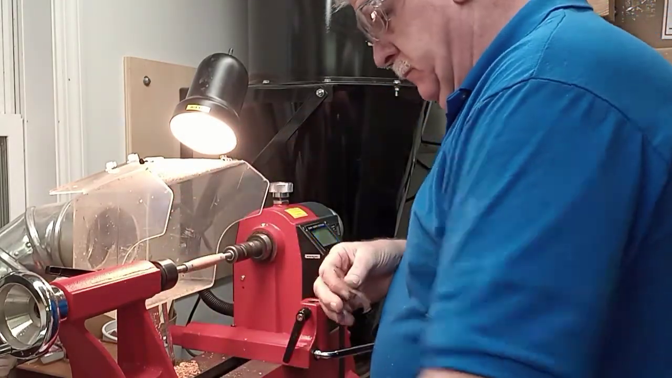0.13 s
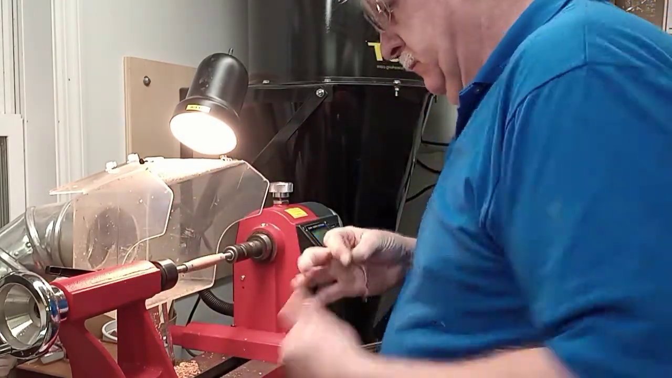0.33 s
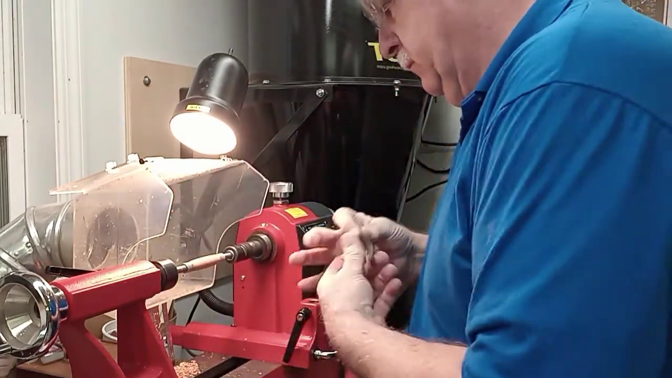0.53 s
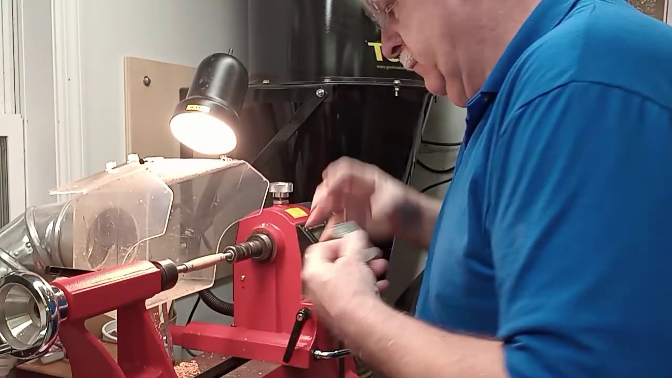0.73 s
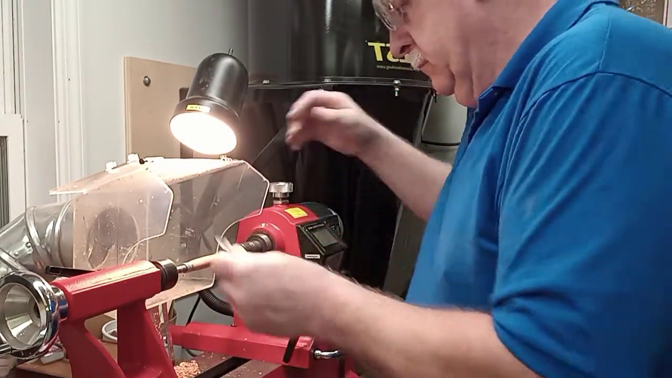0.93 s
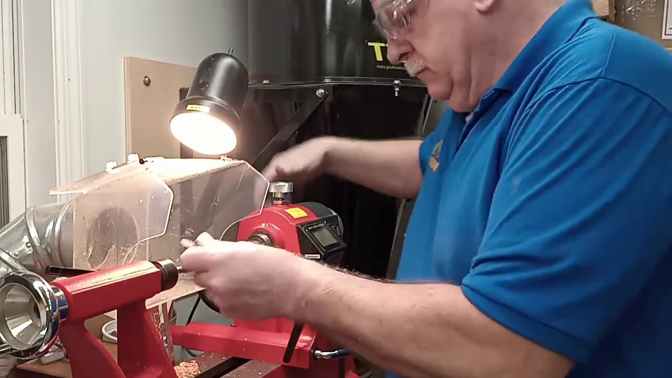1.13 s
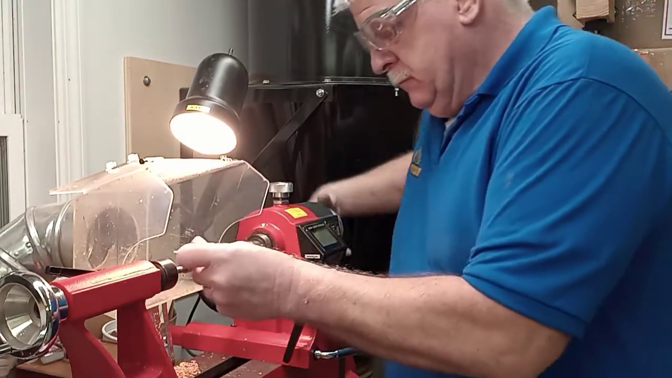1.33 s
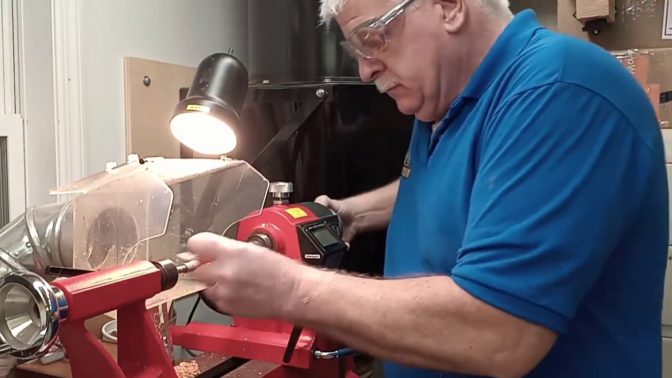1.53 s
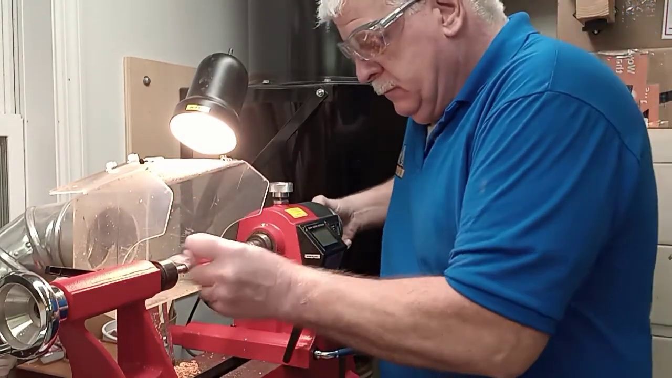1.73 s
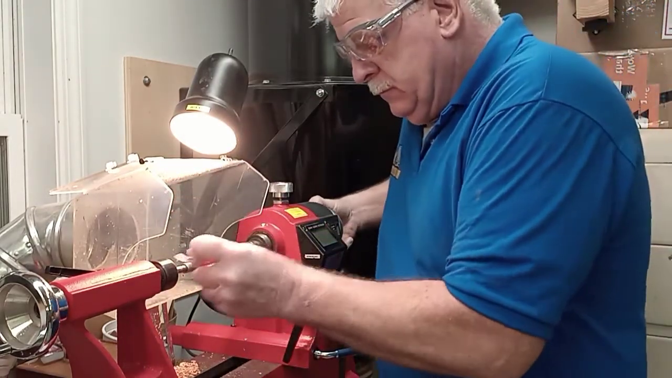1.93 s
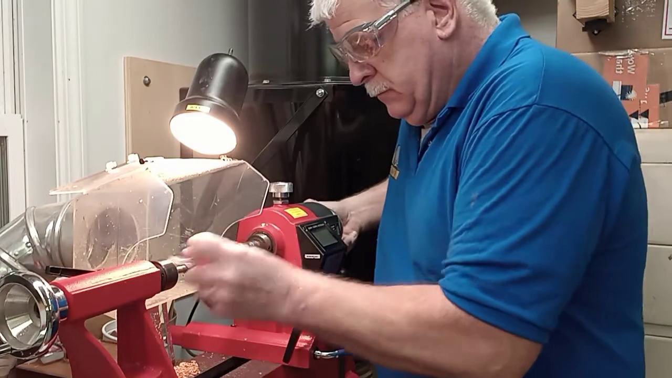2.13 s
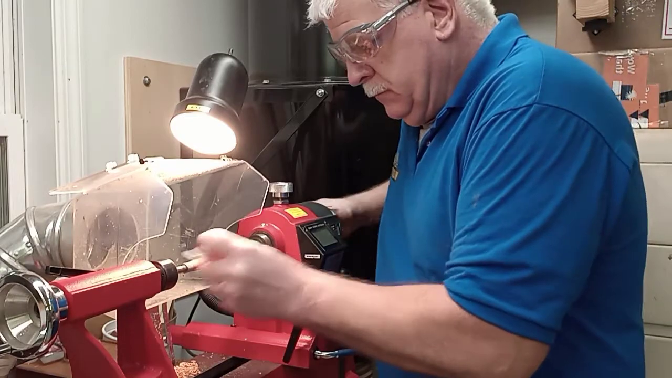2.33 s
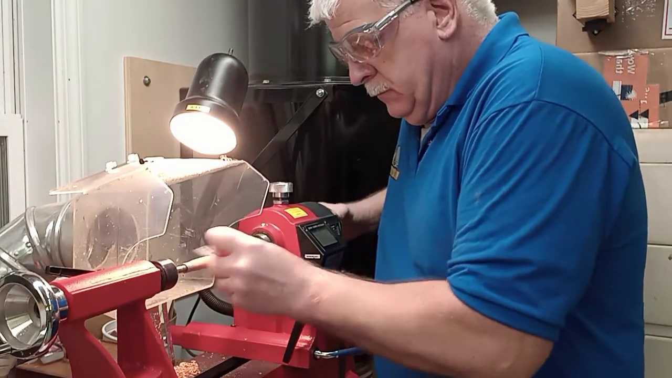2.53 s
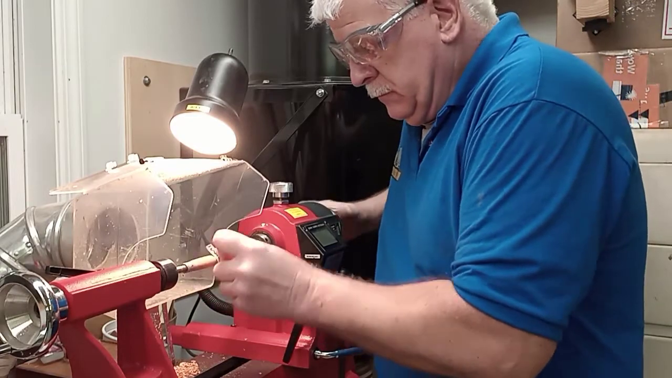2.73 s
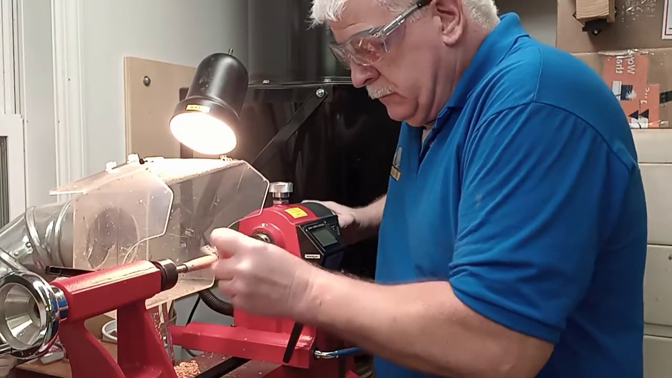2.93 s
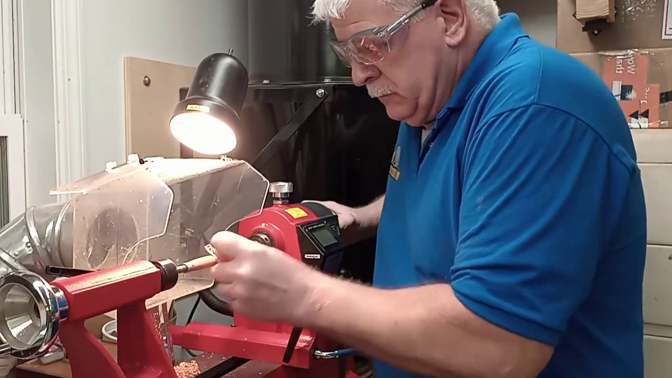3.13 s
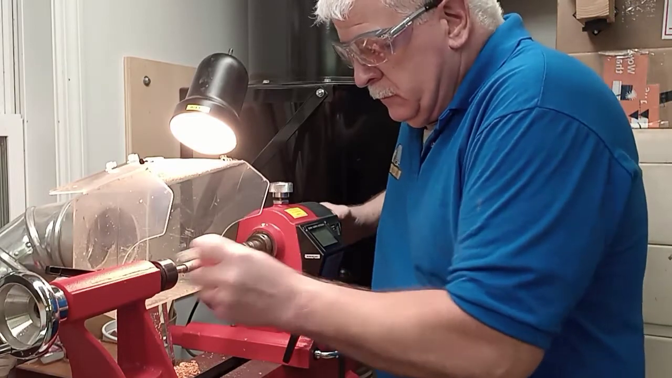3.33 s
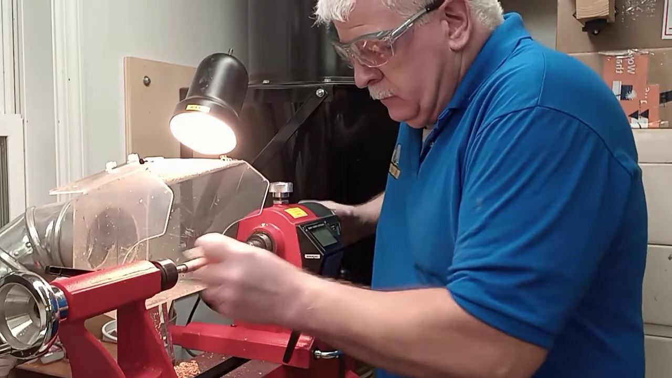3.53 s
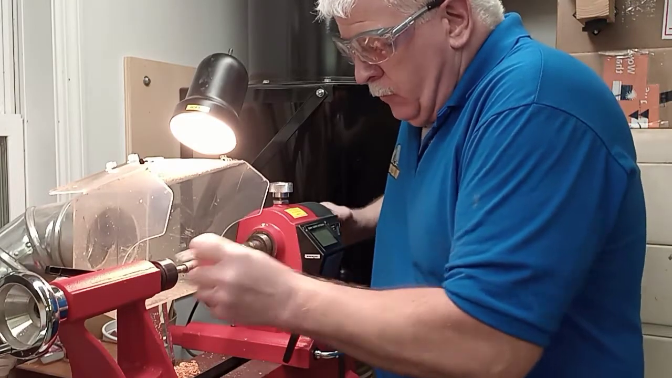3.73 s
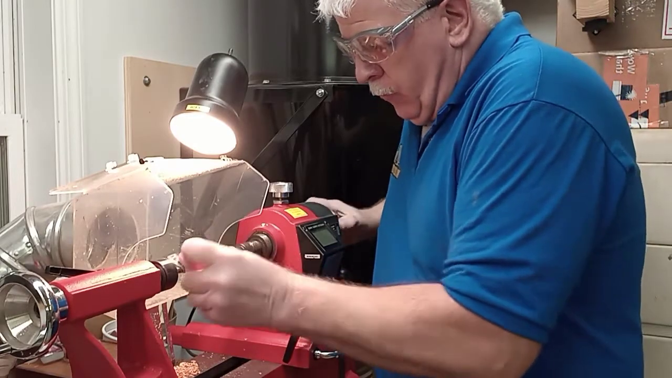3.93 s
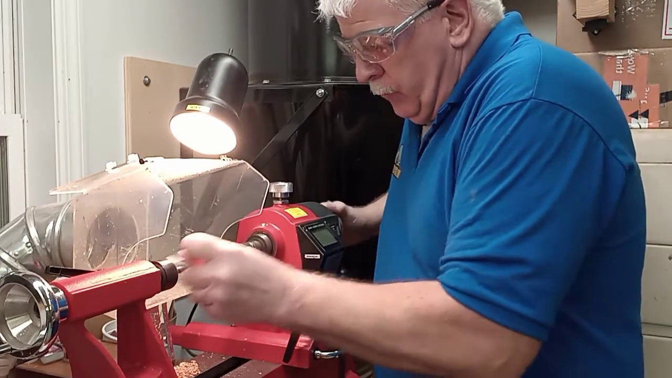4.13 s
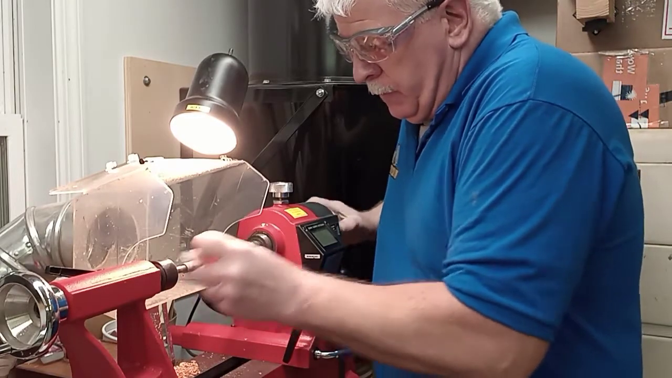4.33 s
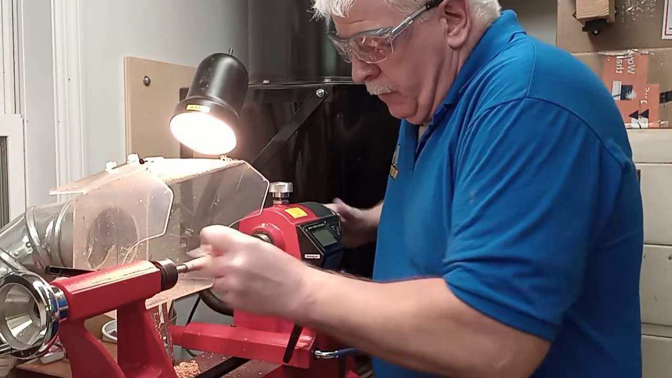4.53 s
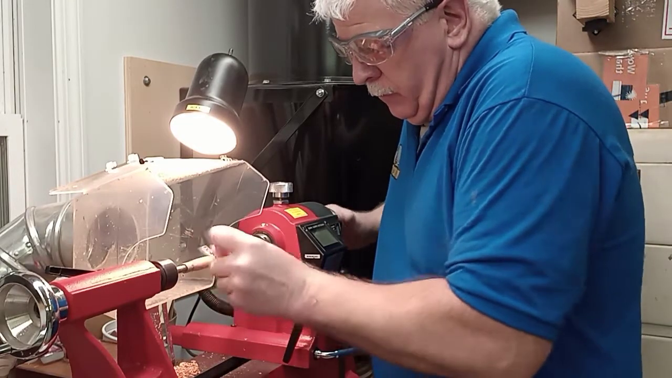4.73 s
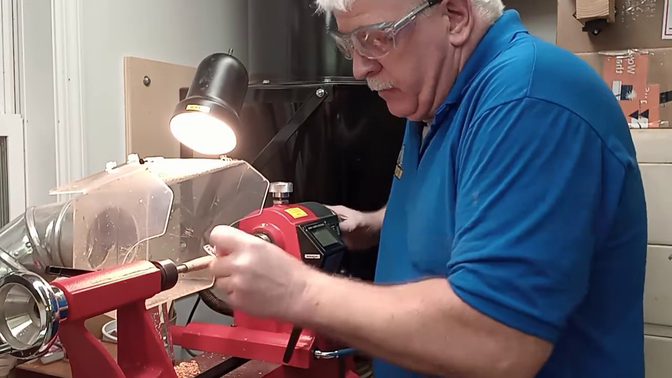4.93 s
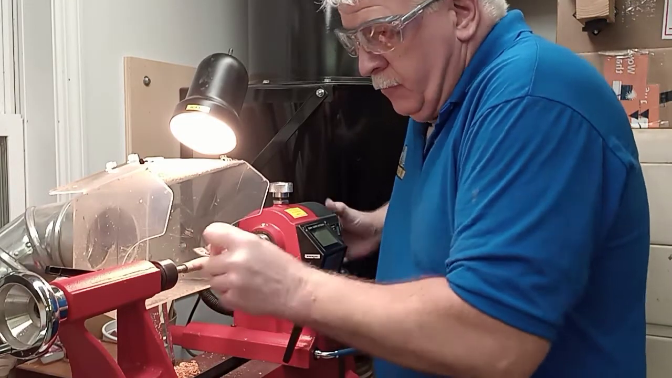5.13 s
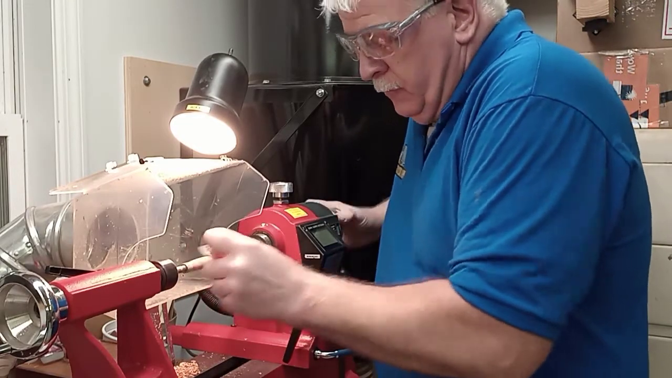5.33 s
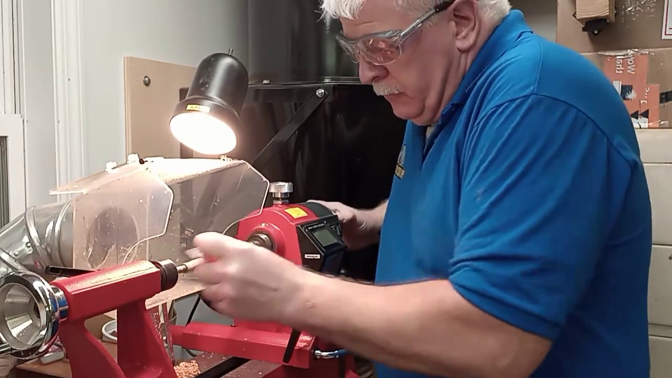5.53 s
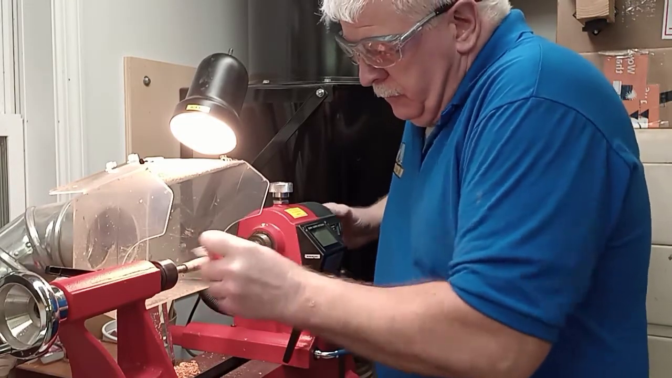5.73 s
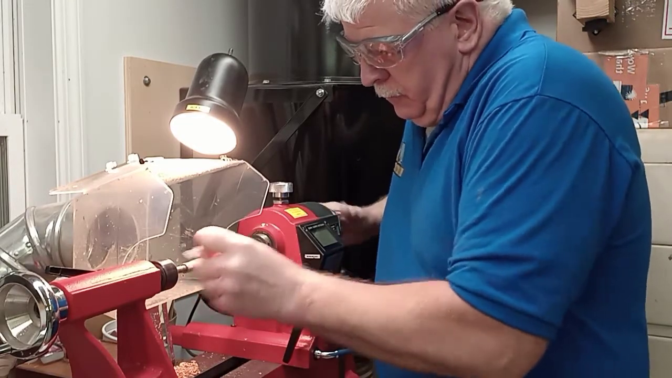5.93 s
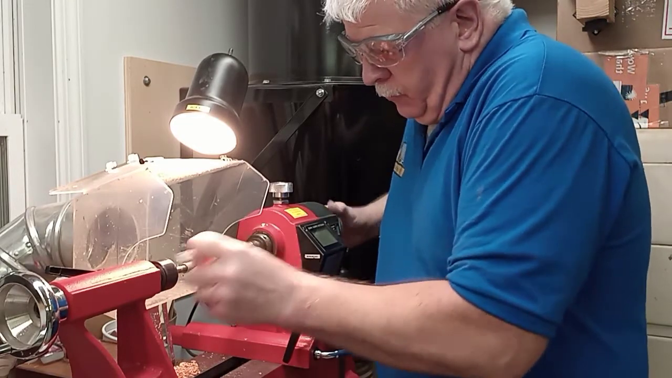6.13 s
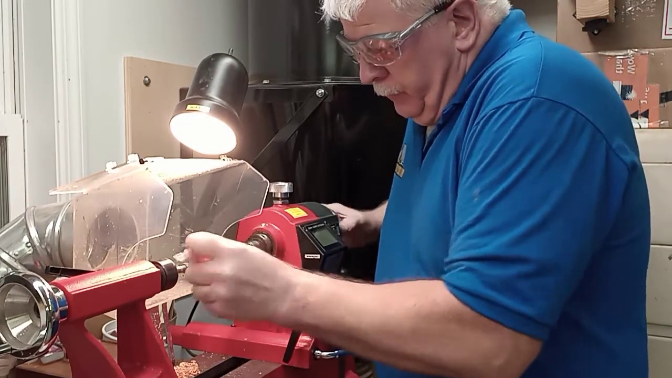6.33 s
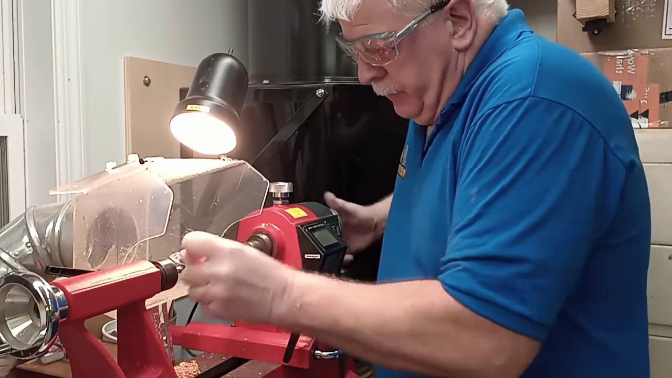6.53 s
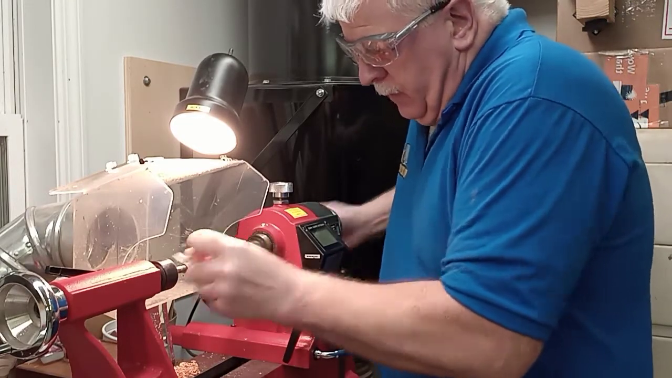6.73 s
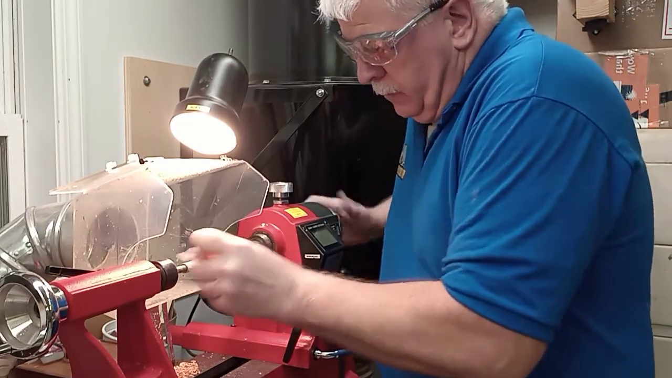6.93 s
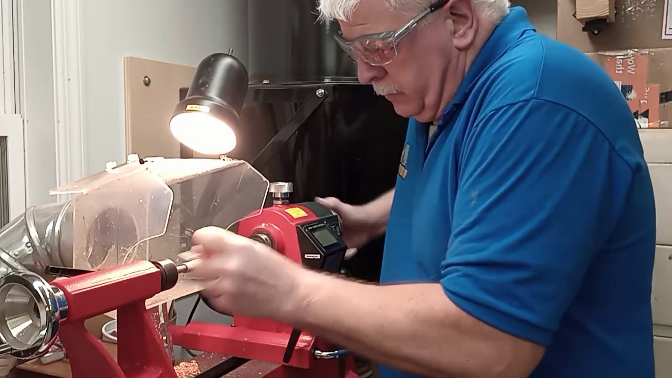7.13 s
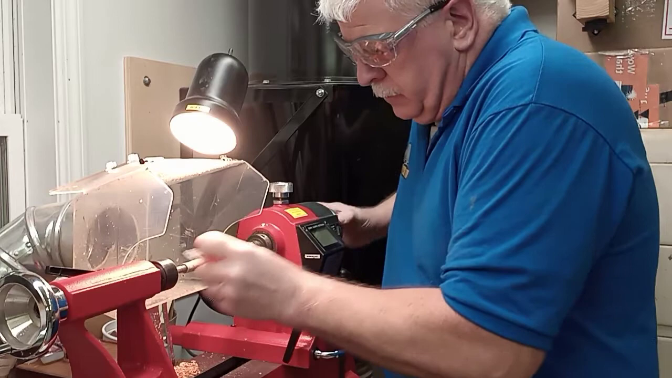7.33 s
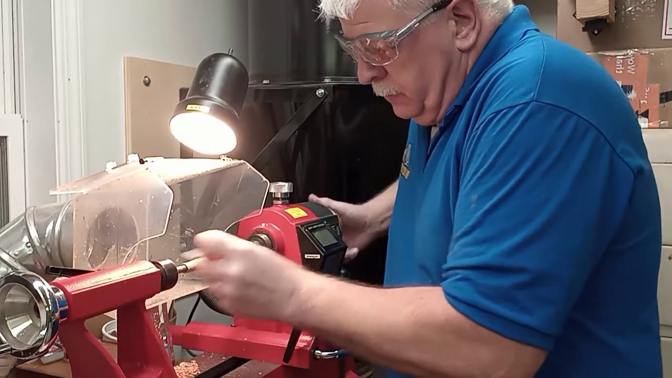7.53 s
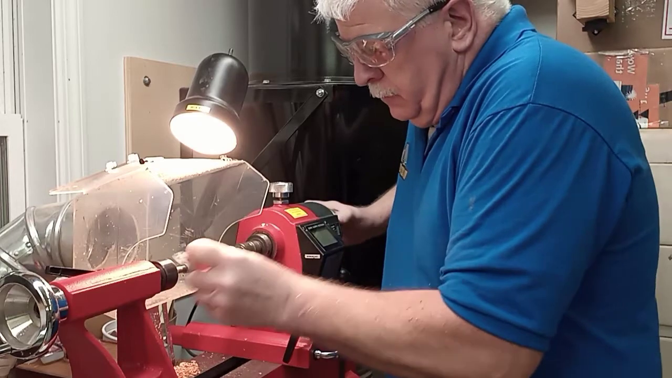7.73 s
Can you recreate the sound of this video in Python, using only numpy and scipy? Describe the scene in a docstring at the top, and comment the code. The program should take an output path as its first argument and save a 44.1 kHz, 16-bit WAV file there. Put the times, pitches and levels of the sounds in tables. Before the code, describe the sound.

Sandpaper rasps rapidly back and forth on a thin wooden piece, after a fading rush of compressed air and some paper rustling.

```python
"""Sandpaper on an idle lathe

An air blast knocks and dies away in the dust hood; fingers shuffle the paper, which snaps taut and
shakes the bench. Rubbed quickly to and fro, its grit hisses and bites, its sheet rasps and the thin
wooden blank rings. Low drones come from outside, over a few soft hoots, room noise and rumble.
The shop walls echo the handwork. Two microphone ports colour the treble differently."""
import sys
import numpy as np
from scipy import signal
from scipy.fft import rfft, irfft, next_fast_len
from scipy.io import wavfile
from scipy.ndimage import uniform_filter1d, map_coordinates

SR = 44100
rng = np.random.default_rng(int(sys.argv[2]) if len(sys.argv) > 2 else 0)


def transcribe(u):
    """Save the signal u as a 16-bit wav file named by the first command-line argument.

    u: samples, shape (n,) or (channels, n), limited to [-1, 1]; the rate is SR.
    q: integer samples, one column per channel.
    """
    v = np.clip(np.atleast_2d(u).T, -1, 1)
    q = np.round(v * 32767).astype(np.int16)
    wavfile.write(sys.argv[1], SR, q)


N = 343098
TIME = np.arange(N) / SR
LAG_S = 7.24 / SR  # lathe sound reaches the left port later


def amp(db):
    return 10 ** (np.asarray(db) / 20)


def unit_rms(x):
    return x / np.sqrt(np.mean(x ** 2) + 1e-20)


def at_hz(points, hz):
    """Interpolate (f, value) points on a log axis."""
    f, values = np.transpose(points)
    return np.interp(np.log(hz + 1), np.log(f + 1), values)


def curves(rows):
    """Interpolate (t, values...) rows to every sample."""
    times, *columns = np.transpose(rows)
    return [np.interp(TIME, times, column) for column in columns]


def wobble(rate_hz):
    """Random curve, linear between Gaussian knots."""
    knots = rng.standard_normal(int(N * rate_hz / SR) + 4)
    return map_coordinates(knots, [TIME * rate_hz], order=1)


def filtered(x, response):
    """Apply a complex frequency response."""
    size = next_fast_len(N + SR // 2)
    return irfft(rfft(x, size) * response(np.fft.rfftfreq(size, 1 / SR)), size)[..., :N]


def shape(points):
    """Response from (f/Hz, gain/dB) points."""
    return lambda hz: amp(at_hz(points, hz))


def modes(rows):
    """Response of parallel resonators, alternating in sign."""
    return lambda f: sum((-1) ** k * amp(db) * 1j * f * width / (hz * hz - f * f + 1j * f * width)
                         for k, (hz, width, db) in enumerate(rows))


# Left-right likeness: f/Hz, coherence/1
COHERENCE = [(30, 0.85), (80, 0.81), (200, 0.72), (550, 0.96), (1000, 0.24), (3000, 0.27), (5500, 0.39),
             (8000, 0.1), (16000, .05)]


def noise(response, grain_db, patchy_db=3.5, lag_s=LAG_S):
    """Unit-rms stereo noise; level flicker (grain) and passing resonances (patches) are shared."""
    grainy = rng.standard_normal((2, N)) * amp(grain_db * wobble(700))
    spectra = signal.stft(grainy, nperseg=256)[2]
    patches = uniform_filter1d(rng.standard_normal(spectra.shape[1:]), size=2, axis=0)
    patches = unit_rms(uniform_filter1d(patches, size=9, axis=1))
    mid_side = signal.istft(spectra * amp(patchy_db * patches), nperseg=256)[1][:, :N]

    def port(side):
        def mix(hz):
            angle = np.arccos(at_hz(COHERENCE, hz)) / 2
            delay = np.exp(-1j * side * np.pi * hz * lag_s)
            return response(hz) * delay * [np.cos(angle), side * np.sin(angle)]
        return filtered(mid_side, mix).sum(0)
    return unit_rms(np.array([port(0.91), port(-1.055)]))


# Hood modes (lower pair, upper pair, broad body), per filter pass: f/Hz, width/Hz, gain/dB
HOOD_MODES = [(342, 39, 2.5), (414, 25, -6), (478.7, 63, -1.5), (552, 64, -7.5), (270, 81, -6),
              (727, 690, 0)]
# Boom envelope: t/s, lower pair/dB, upper pair/dB, broad body/dB
HOOD_LEVELS = [(0, -40, -55, -43.5), (.04, -65, -55, -59.5), (.09, -55, -56, -54.5), (.13, -66, -46.5, -54),
               (.165, -49, -56, -61), (.21, -51, -54, -61), (.26, -62, -58.5, -61), (.3, -62, -58, -62),
               (.325, -59, -58, -67), (.37, -50, -57, -63), (.395, -64, -62, -60), (.42, -52, -58, -68),
               (.45, -58, -66, -74), (.516, -60.5, -67, -78), (.574, -78, -78, -81), (.65, -81, -75, -89),
               (.8, -85, -100, -98), (.9, -102, -92, -106)]


def hood_boom():
    """Turbulence drives the hood, which is too small to sound below its lowest mode."""
    highpass = lambda hz: 1 / (1 + (200 / (hz + 1)) ** 6)
    turbulence = noise(highpass, grain_db=-1, patchy_db=-2, lag_s=0.00038)
    out = np.zeros((2, N))
    for db, group in zip(curves(HOOD_LEVELS), (HOOD_MODES[:2], HOOD_MODES[2:4], HOOD_MODES[4:])):
        ring = unit_rms(filtered(turbulence, lambda hz: modes(group)(hz) ** 2))
        out += amp(db + 1.4 * wobble(40)) * ring
    return out * amp([[-0.25], [0.25]])


# Duct modes: f/Hz, width/Hz, gain/dB
DUCT_MODES = [(1060, 40, -0.5), (1200, 66, -4), (1315, 28, -2), (1522, 59, 0), (1714, 82, -3),
              (2020, 58, -5), (2284, 38, -8), (2750, 146, -7), (3150, 18, -9.5), (4020, 49, 1.5),
              (4700, 33, 2.5), (5240, 37, -1), (5230, 23, -25), (5800, 76, -31)]


def duct_rush(blast_db):
    """Air rushes through the duct's modes, dull above 9 kHz."""
    lower = noise(modes(DUCT_MODES[:9]), grain_db=1, patchy_db=-0.5, lag_s=0.00033)
    upper = noise(modes(DUCT_MODES[9:]), grain_db=2.5, patchy_db=1.5, lag_s=0.000332)
    rush = amp(-41 + blast_db + 0.32 * wobble(38)) * lower + amp(-48.5 + 1.1 * blast_db) * upper
    return filtered(rush, lambda hz: 1 / (1 + (hz / 9000) ** 8))


# Jet spectrum: f/Hz, density/dB
JET_SPECTRUM = [(2500, -14), (4000, -6), (6500, -0.5), (10000, -12), (12000, -23), (14000, -60)]


def jet_fizz(blast_db, trickle_s=1.6):
    """The jet fades with the blast, then trickles on briefly."""
    trickle = amp(-89) / (1 + (TIME / trickle_s) ** 12)
    level = amp(-45.5 + 1.37 * blast_db) + trickle
    return level * noise(shape(JET_SPECTRUM), grain_db=1, patchy_db=1.5, lag_s=0)


# Blast decay: t/s, strength/dB
BLAST_STRENGTH = [(0, -0.5), (.07, -3.5), (.3, -9.5), (.46, -16), (.57, -27), (.77, -45), (.95, -51),
                  (1.2, -66)]


def air_blast(whine_hz=14180):
    """Hood, duct, jet and a thin whine die away together."""
    blast_db, = curves(BLAST_STRENGTH)
    phase = 2 * np.pi * np.cumsum(whine_hz + 15 * wobble(56)) / SR
    whine = amp(-79 + 0.6 * blast_db + 3.1 * wobble(23)) * np.sin(phase)
    return hood_boom() + duct_rush(blast_db) + jet_fizz(blast_db) + whine


# Shop background: f/Hz, density/dB
ROOM_SPECTRUM = [(150, -17.5), (300, -6), (500, -12), (1000, -7.5), (2500, -17.5), (5000, -45), (8000, -16),
                 (11000, -39), (16000, -35)]


def room_noise():
    """Faint noise of the shop's air, wandering in level."""
    level = amp(-83 + 1.94 * wobble(2.55) + 2.5 * wobble(6))
    return level * noise(shape(ROOM_SPECTRUM), grain_db=1, patchy_db=4, lag_s=0.00039)


# Rumble envelope: t/s, level/dB
RUMBLE_LEVELS = [(0, -99), (.3, -86), (1.3, -83), (1.6, -87), (2.5, -92), (3.1, -80.5), (4.0, -86.5),
                 (4.3, -81.5), (5.8, -77.5), (6.5, -83), (7.78, -84.5)]
# Rumble spectrum: f/Hz, density/dB
RUMBLE_SPECTRUM = [(15, -17), (30, -13), (55, -1.5), (100, 4), (200, -3), (350, -22.5), (600, -36)]


def rumble():
    """Low noise swells and ebbs."""
    db, = curves(RUMBLE_LEVELS)
    return amp(db + 2.8 * wobble(8)) * noise(shape(RUMBLE_SPECTRUM), grain_db=-2, lag_s=0)


# Brief tones: centre t/s, level/dB, f/Hz, spread/Hz, length/s
BRIEF_TONES = [(.133, -48.5, 1192, 51, 0.076), (.136, -41.5, 1234, 150, 0.0055), (.68, -84, 460, 28, 0.23),
               (1.213, -58, 170.2, 45, 0.0068), (1.296, -65, 574, 60, 0.041),
               (1.307, -68.5, 589, 60, 0.013), (1.321, -68, 598, 60, 0.018), (1.82, -80, 132.7, 3.6, 0.19),
               (1.91, -75, 137, 7, 0.062), (1.89, -80, 92, 8, 0.14), (3.05, -72, 136, 6.3, 0.077),
               (4.25, -72.5, 132, 3.91, 0.13), (7.006, -67, 332.3, 30, 0.055), (7.399, -65, 477, 30, 0.045),
               (7.397, -75, 363, 40, 0.039)]


def brief_tones():
    """A knock in the air blast, the hood's fading ring, then soft hoots; neighbours blur each tone."""
    out = np.zeros((2, N))
    for centre, db, hz, spread_hz, length in BRIEF_TONES:
        t = TIME - centre
        detune, phase = rng.standard_normal((2, 3, 1))
        swell = np.exp(-(t / (0.57 * length)) ** 2)
        tone = np.sin(2 * np.pi * hz * t + [[-0.3], [0.3]])
        blur = np.sin(2 * np.pi * ((hz + spread_hz * detune) * TIME + phase)).sum(0)
        out += amp(db) * swell * (tone + 0.5 * blur)
    return out


# Finger shuffles: t/s, level/dB, dull re bright/dB, rise/s, t60/s
PAPER_SHUFFLES = [(.465, -58.5, -30, 0.014, 0.37), (0.533, -47, -32, 0.0049, 0.076),
                  (.6, -62, -27, 0.014, 0.11), (0.669, -55.5, -12, 0.011, 0.31),
                  (.705, -63, 2, 0.022, 0.17), (.79, -54.5, -9, 0.049, 0.29),
                  (0.839, -52, -27, 0.014, 0.12), (.89, -69.5, -4, 0.035, 0.35),
                  (0.95, -68, -10, 0.0085, 0.66), (1.053, -49, -17.5, 0.021, 0.22),
                  (1.083, -55, -1.5, 0.02, 0.23), (1.204, -39, 0, 0.015, 0.2)]


def paper_shuffles():
    """Fingers shift the paper: bright grit and dull sheet rustle under one fade."""
    bright, dull = np.zeros((2, N))
    for onset, db, dull_db, rise, t60 in PAPER_SHUFFLES:
        t = np.maximum(TIME - onset + rise, 0)
        fade = amp(db - 60 * t / t60) * (1 - np.exp(-(t / rise) ** 2))
        bright += fade
        dull += fade * amp(dull_db)
    grit = shape([(2500, -68), (4300, -8), (5200, -2.5), (6500, 6.5), (8500, -0.5), (11000, -0.5),
                  (16000, -21)])
    sheet = shape([(600, -13), (1300, -8.5), (1700, 1.5), (3000, 3), (4500, 5), (7000, -9)])
    return (bright * noise(grit, grain_db=1.5, patchy_db=-3.5, lag_s=0)
            + dull * noise(sheet, grain_db=1, patchy_db=-3.5, lag_s=0))


# Paper cracks: t/s, level/dB, f/Hz
PAPER_SNAPS = [(.783, -63, 3300), (1.2083, -28, 3500), (1.2081, -40, 6500), (1.2223, -39, 5600),
               (1.2226, -43, 2000)]


def paper_snaps(width_s=0.0004):
    """The taut paper cracks in Gaussian tone pulses."""
    out = np.zeros(N)
    for centre, db, hz in PAPER_SNAPS:
        t = TIME - centre
        out += amp(db) * np.exp(-(t / width_s) ** 2) * np.sin(2 * np.pi * hz * t)
    return out


def bench_thump(onset_s=1.209):
    """The snap sets the bench's low modes ringing."""
    # f/Hz, level/dB, t60/s
    bench = [(120, -65, 0.6), (171, -81.5, 1.6), (250, -67, 0.16), (74.5, -75, 0.4)]
    t = np.maximum(TIME - onset_s, 0)
    return sum(amp(db - 60 * t / t60 + 2.2 * wobble(18)) * np.sin(2 * np.pi * hz * t)
               for hz, db, t60 in bench)


def stroke_envelope(starts, duty, shares, levels_db, lull_db, rise_s):
    """Level in dB, set at shares of each slide; between slides the hand slows, stops and turns."""
    period = np.diff(starts, append=2 * starts[-1] - starts[-2])
    slide = duty * period
    gap = np.roll(period - slide, 1)
    rise = np.minimum(rise_s, 0.8 * gap)
    first_db, previous_db = levels_db[0], levels_db[-1][:-1]
    floor_db = np.minimum(first_db, np.append(first_db[0], previous_db)) - lull_db
    before_db = np.append(floor_db[0], previous_db)
    knee_db = before_db + 0.63 * (floor_db - before_db)
    knee_s = -gap + 0.55 * (gap - rise)
    knots_s = starts + np.vstack([knee_s, -rise, np.outer(shares, slide)])
    knots_db = np.vstack([knee_db, floor_db, *levels_db])
    return np.interp(TIME, knots_s.T.ravel(), knots_db.T.ravel(), left=-120)


# Strokes: t/s, sliding duty/1, coarse grit (first, settled, end)/dB, fine grit (start, end)/dB, flex/dB
SANDING_STROKES = [(1.3995, 0.58, -61.5, -64, -55, -55.5, -50.5, -76),
                   (1.5195, 0.58, -56, -54.5, -55.5, -48, -49, -69),
                   (1.6247, 0.62, -56, -54, -53.5, -48, -54.5, -70),
                   (1.738, 0.48, -56, -51.5, -52, -49, -47, -75),
                   (1.836, 0.42, -46.5, -46, -47, -47.5, -45.5, -74),
                   (1.92, 0.52, -53.5, -50.5, -45.5, -53, -42.5, -71),
                   (2.024, 0.79, -37.5, -49.5, -52.5, -42.5, -50, -68),
                   (2.1184, 0.57, -53, -47, -50.5, -52, -46.5, -72),
                   (2.206, 0.58, -44.5, -45.5, -39, -47.5, -43.5, -67.5),
                   (2.3086, 0.65, -44, -47.5, -48.5, -41.5, -48.5, -65),
                   (2.392, 0.64, -50, -47.5, -43.5, -47.5, -45.5, -72.5),
                   (2.486, 0.74, -44.5, -45.5, -49, -40.5, -47, -63.5),
                   (2.564, 0.71, -45.5, -51, -44.5, -50, -49.5, -63.5),
                   (2.662, 0.52, -46, -43, -42, -43.5, -42, -71),
                   (2.7535, 0.56, -42.5, -45.5, -42.5, -48, -48, -71.5),
                   (2.844, 0.74, -44.5, -50.5, -47.0, -42.5, -49, -68.5),
                   (2.926, 0.6, -45.5, -47, -43, -49.5, -49, -71),
                   (3.026, 0.7, -44, -51, -50.5, -43.5, -47.5, -68),
                   (3.1148, 0.66, -47.5, -48.5, -47.5, -50, -49.5, -71.5),
                   (3.209, 0.66, -48, -50, -49, -46, -45, -70),
                   (3.2984, 0.6, -42.5, -47, -43.5, -47.5, -47.5, -71.5),
                   (3.395, 0.71, -52, -51, -49.5, -47, -49, -73),
                   (3.477, 0.65, -40.5, -48.5, -46, -47.5, -47.5, -72),
                   (3.573, 0.7, -54, -50, -54, -45.5, -46.5, -71.5),
                   (3.6566, 0.68, -54, -54.0, -43.5, -50.5, -48.5, -76),
                   (3.7534, 0.71, -46, -50.5, -48.5, -45.5, -47.5, -70),
                   (3.845, 0.72, -40.5, -49.0, -46.5, -44, -51, -67),
                   (3.937, 0.65, -54, -48.5, -49, -48.5, -45.5, -74.5),
                   (4.026, 0.64, -36.5, -42.5, -44.5, -40.5, -48, -62.5),
                   (4.1184, 0.65, -42.5, -49, -51, -46, -47, -66),
                   (4.207, 0.66, -35.5, -47, -52, -41, -53, -62.5),
                   (4.3, 0.66, -48, -51.5, -48, -46.5, -43, -68.5),
                   (4.382, 0.59, -44.5, -56, -45, -47.5, -48.5, -68.5),
                   (4.479, 0.74, -51, -50.5, -48, -46.5, -44.5, -73),
                   (4.568, 0.61, -38.5, -44.5, -44, -41.5, -46, -59.5),
                   (4.6677, 0.63, -52, -50.5, -43.5, -46, -41.5, -68),
                   (4.76, 0.71, -40, -44.5, -46, -42.5, -50, -64),
                   (4.8564, 0.79, -50, -46, -47, -44.5, -44, -68),
                   (4.9522, 0.63, -33, -50.5, -47, -41.5, -50.5, -63),
                   (5.043, 0.72, -53.5, -50, -43, -49, -42.5, -61.5),
                   (5.137, 0.58, -34.5, -42, -43, -38, -50.5, -55),
                   (5.2385, 0.71, -54, -50.5, -51, -48, -45, -67),
                   (5.337, 0.65, -54, -48.5, -52, -50, -53.5, -66),
                   (5.429, 0.78, -51, -46.5, -50, -47, -48, -69.5),
                   (5.503, 0.5, -45, -48.5, -47.5, -51, -48.5, -65),
                   (5.607, 0.66, -50, -50.5, -55, -47.5, -46.5, -73.5),
                   (5.685, 0.62, -61, -55, -49.5, -55, -51, -74),
                   (5.784, 0.77, -53.5, -52.5, -49.5, -51, -47.5, -71.5),
                   (5.8796, 0.73, -41, -48.5, -51, -47.5, -53, -67),
                   (5.9764, 0.73, -53.5, -50, -47, -49, -43.5, -67.5),
                   (6.061, 0.78, -36.5, -50, -49, -42, -52.5, -61.5),
                   (6.162, 0.72, -51, -50, -52, -48.0, -47.0, -69),
                   (6.2449, 0.79, -56, -54, -45, -53, -47.5, -72.5),
                   (6.349, 0.6, -48, -47.5, -47, -43, -44.5, -62.5),
                   (6.438, 0.64, -42, -58, -47, -49, -49, -68),
                   (6.535, 0.72, -48.5, -53.0, -51, -43.5, -48, -68.5),
                   (6.624, 0.57, -45.5, -55, -43, -51, -46.5, -71),
                   (6.727, 0.66, -43.5, -50, -48, -41.5, -46.5, -64),
                   (6.809, 0.67, -48.5, -53, -44.5, -53.5, -46.5, -70),
                   (6.9176, 0.75, -45.5, -49.5, -50.5, -43.5, -48.5, -65),
                   (7.004, 0.72, -53.5, -61, -48.5, -54, -48.5, -77),
                   (7.111, 0.69, -50.5, -46.5, -48, -45, -46, -69),
                   (7.205, 0.71, -48.5, -49, -52.5, -49.5, -49, -69),
                   (7.3024, 0.79, -51.5, -53, -52.5, -50.5, -47, -71),
                   (7.3951, 0.65, -56, -59.5, -50, -54, -50, -74),
                   (7.509, 0.69, -51, -51.5, -53, -46.0, -48, -70),
                   (7.604, 0.75, -45, -57, -47, -52, -48.5, -69.5),
                   (7.712, 0.82, -44, -53, -52.5, -43.5, -47, -59.5)]
# Fine grit: f/Hz, density/dB
HISS_SPECTRUM = [(300, -43), (1500, -29), (4000, -48.5), (6000, -20), (8500, 3.5), (16000, -2)]
# Coarse grit: f/Hz, density/dB
BITE_SPECTRUM = [(2500, -48), (4000, -34.5), (4600, -14.5), (5000, -8), (5300, -3.5), (5900, -1),
                 (6500, 4.5), (8000, 0), (10000, -14.5), (12000, -54)]
# Flexing paper: f/Hz, density/dB
RASP_SPECTRUM = [(1200, -51), (2200, -16), (2900, -13.5), (3500, -4), (4100, -1), (4700, 3), (6000, -20.5),
                 (8000, -56)]


def sanding(bite_delay_s=0.00056):
    """Fine grit hisses as the paper slides; coarse grit bites, settles and makes the sheet rasp."""
    starts, duty, first_db, settled_db, last_db, *fine_db, flex_db = np.transpose(SANDING_STROKES)
    bite_starts = starts + bite_delay_s
    shares = [0, 0.024, 0.44, 1]  # contact, first bite, settled, end
    coarse_db = np.array([first_db - 2.5, first_db, settled_db, last_db])
    sheet_db = flex_db + 0.67 * (coarse_db - coarse_db.mean(0)) + 3 * (0.5 - np.c_[shares])
    hiss_db = stroke_envelope(starts, duty, [0, 1], fine_db, lull_db=16.5, rise_s=0.013)
    bite_db = stroke_envelope(bite_starts, duty, shares, coarse_db, lull_db=11, rise_s=0.013)
    rasp_db = stroke_envelope(bite_starts, duty, shares, sheet_db, lull_db=4.5, rise_s=0.012)
    uneven = wobble(70)
    hiss = amp(hiss_db + 0.72 * uneven) * noise(shape(HISS_SPECTRUM), grain_db=1.3, patchy_db=1)
    bite = amp(bite_db + 0.97 * uneven) * noise(shape(BITE_SPECTRUM), grain_db=1, patchy_db=2.5)
    rasp = amp(rasp_db) * noise(shape(RASP_SPECTRUM), grain_db=1, patchy_db=1.5)
    return hiss + bite + rasp


# Blank on its mandrel: f/Hz, width/Hz, gain/dB
BLANK_MODES = [(486.5, 14, -14.5), (620.6, 19, 0.5), (736.7, 14.7, 3.5), (936, 53, 1), (1089, 9.4, 8),
               (1206, 51, 3), (1524, 88, -1.5), (1865, 120, -2.5), (2128, 23, 5), (2406, 93, -4)]
# Paper catches: t/s, level/dB, length/s, upper re lower modes/dB
CATCHES = [(1.756, -81.5, 0.047, 5), (2.317, -72.5, 0.042, -1), (2.852, -90, 0.029, 18),
           (4.126, -79, 0.063, -1), (4.944, -75, 0.045, -3), (5.135, -72.5, 0.051, 5.5),
           (6.166, -94, 0.053, 13.5), (6.343, -93, 0.056, 15), (6.744, -74, 0.042, -11),
           (7.733, -70.5, 0.059, 3)]


def blank_ring():
    """The blank murmurs under the sanding; each catch of the paper shakes it briefly."""
    lower = (TIME > SANDING_STROKES[0][0]) * amp(-92 + 2.2 * wobble(13))
    upper = lower * amp(6)
    for centre, db, length, upper_db in CATCHES:
        push = amp(db) * np.exp(-((TIME - centre) / (0.45 * length)) ** 2)
        lower += push
        upper += push * amp(upper_db)
    ring = lambda rows: noise(modes(rows), grain_db=6, patchy_db=3, lag_s=0.00021)
    return lower * ring(BLANK_MODES[:3]) + upper * ring(BLANK_MODES[3:])


# Torn grains: t/s, level before trim/dB
GRAIN_SNAGS = [(2.2563, -31.5), (2.2706, -32), (2.4454, -28), (2.6928, -30), (2.8004, -33), (2.9315, -32),
               (2.9697, -33), (3.1205, -34), (3.1514, -27.5), (3.2145, -34), (3.8055, -35), (4.0382, -31),
               (4.2095, -33), (4.2165, -23), (4.5746, -31), (4.7625, -42), (4.956, -30), (5.0685, -31),
               (5.087, -35), (5.108, -33), (5.1407, -40), (5.1432, -26), (5.1462, -40), (5.1585, -40),
               (5.885, -24), (6.0615, -32), (6.3535, -39), (6.6755, -39), (6.9205, -47), (7.1405, -36),
               (7.606, -39), (7.678, -44)]


def grain_snags(hz=6740, width_s=0.0007, trim_db=-3.5):
    """Single coarse grains tear loose, each with a short scratch."""
    out = np.zeros((2, N))
    for centre, db in GRAIN_SNAGS:
        detune, phase = rng.standard_normal(2)
        sample = round(centre * SR)
        span = slice(sample - SR // 100, sample + SR // 100)
        t = TIME[span] - centre - np.array([[LAG_S], [0]])
        pulse = amp(db + trim_db) * np.exp(-(t / width_s) ** 2)
        out[:, span] += pulse * np.sin(2 * np.pi * (hz * (1 + 0.024 * detune) * t + phase))
    return out


# Lower drone: t/s, f/Hz, level/dB
LOW_DRONE_TRACK = [(2.98, 74.8, -95), (3.046, 75, -76), (3.1, 75.4, -101), (3.145, 74, -74),
                   (3.34, 76.7, -76), (3.39, 75.7, -69), (3.45, 76.2, -71), (3.494, 73.5, -77),
                   (3.53, 71, -71), (3.635, 75.5, -78), (3.67, 76.9, -90), (3.93, 75, -102),
                   (4.016, 70.3, -75), (4.126, 69.6, -79), (4.2, 67.7, -92), (4.35, 65.3, -72),
                   (4.44, 65.2, -76), (4.494, 64.5, -65), (4.65, 64, -93), (4.73, 63.5, -69),
                   (4.81, 62.8, -80), (4.84, 62.7, -75), (4.908, 61.6, -88), (4.982, 62.5, -68),
                   (5.1, 61.8, -84), (5.168, 64.6, -65), (5.21, 65.6, -73), (5.25, 67.7, -72),
                   (5.35, 73.1, -69), (5.5, 82.2, -66), (5.53, 83.6, -71), (5.565, 86.5, -55),
                   (5.61, 86.4, -76), (5.655, 87.3, -58), (5.7, 91.2, -65), (5.77, 96, -57),
                   (5.84, 99.4, -74), (5.87, 99, -61), (5.92, 102, -91), (5.97, 100.4, -64),
                   (6.03, 100.2, -83), (6.15, 100.6, -60), (6.24, 98.4, -69.5), (6.3, 102.1, -77),
                   (6.46, 101.3, -80), (6.55, 98.7, -83), (6.68, 99.3, -75), (6.77, 100.8, -95),
                   (6.87, 99.9, -68), (6.95, 98.7, -77), (7.02, 99, -78), (7.19, 96.9, -92),
                   (7.33, 90.2, -75), (7.42, 88, -93), (7.48, 86, -76), (7.55, 85, -88), (7.6, 83.8, -83)]
# Upper drone: t/s, f/Hz, level/dB
HIGH_DRONE_TRACK = [(3.4, 137.6, -100), (3.55, 136.4, -89), (3.606, 135, -70), (3.652, 133, -91),
                    (3.712, 133, -73), (3.768, 133.6, -101), (3.86, 135, -81), (3.96, 134, -96),
                    (4.01, 133, -74), (4.16, 130.6, -91), (4.216, 129, -76), (4.276, 131.3, -83),
                    (4.314, 135, -85), (4.4, 130.5, -71), (4.56, 129.3, -64), (5.14, 127, -65.5),
                    (5.25, 130, -83), (5.36, 142.3, -76), (5.5, 140, -106)]


def outside_drones():
    """Two low tones flutter, their phase wandering separately at each port."""
    out = np.zeros((2, N))
    for track, flutter_db, waver_hz in ((LOW_DRONE_TRACK, 2.2, 3), (HIGH_DRONE_TRACK, 1.5, 2.5)):
        hz, db = curves(track)
        sounding = (TIME > track[0][0]) & (TIME < track[-1][0])
        phase = 2 * np.pi * np.cumsum(hz + waver_hz * wobble(25)) / SR
        drift = 0.23 * np.array([wobble(16), wobble(28)])
        out += sounding * amp(db + flutter_db * wobble(22)) * np.sin(phase + drift)
    return out


# Shop decay: f/Hz, t60/s
WALL_DECAY = [(200, 0.29), (2000, 0.25), (8000, 0.33), (16000, 0.065)]


def wall_reverb(x):
    """Each band decays at its own rate; a new random tail per block keeps the echo free of ringing."""
    hop, tail_samples = SR // 5, SR // 4
    starts = np.arange(0, N + hop, hop)
    hz, t, spectra = signal.stft(rng.standard_normal((len(starts), 2, tail_samples)), SR, nperseg=256)
    decay = amp(-60 * t / at_hz(WALL_DECAY, hz)[:, None])
    tails = signal.istft(spectra * decay, SR, nperseg=256)[1]
    padded = np.pad(x, ((0, 0), (hop, 2 * hop)))
    out = np.zeros((2, N + 2 * SR))
    for start, tail in zip(starts, tails):
        block = padded[:, start:start + 2 * hop] * np.hanning(2 * hop)
        echo = signal.fftconvolve(block, tail / np.linalg.norm(tail[0]), axes=1)
        out[:, start:start + echo.shape[1]] += echo
    return out[:, hop:hop + N]


def scene():
    """Stereo mix; only the handwork feeds the reverb."""
    handwork = paper_shuffles() + paper_snaps() + sanding() + blank_ring() + grain_snags()
    background = room_noise() + rumble() + brief_tones() + outside_drones()
    return air_blast() + handwork + amp(-4.5) * wall_reverb(handwork) + bench_thump() + background


# Left port response: f/Hz, gain/dB
LEFT_RESPONSE = [(3000, 0), (5000, -0.5), (6700, 3), (7300, 3.5), (8300, -11), (10000, -17.5),
                 (13500, -18.5), (14200, -2.5), (15000, -4.5), (15800, 9)]
# Right port response: f/Hz, gain/dB
RIGHT_RESPONSE = [(3000, 0), (5000, -1.5), (6300, -3), (7800, -12), (10400, 3.5), (12000, 0.5), (13700, -8),
                  (14600, 2), (15800, 3)]
CUTOFF_HZ = 15740


def record(dry):
    """Each microphone port adds its own resonances; nothing passes above the cutoff."""
    ports = lambda hz: amp([at_hz(LEFT_RESPONSE, hz), at_hz(RIGHT_RESPONSE, hz)]) * (hz < CUTOFF_HZ)
    return filtered(dry, ports)


dry = scene()
out = record(dry)
transcribe(out)
```